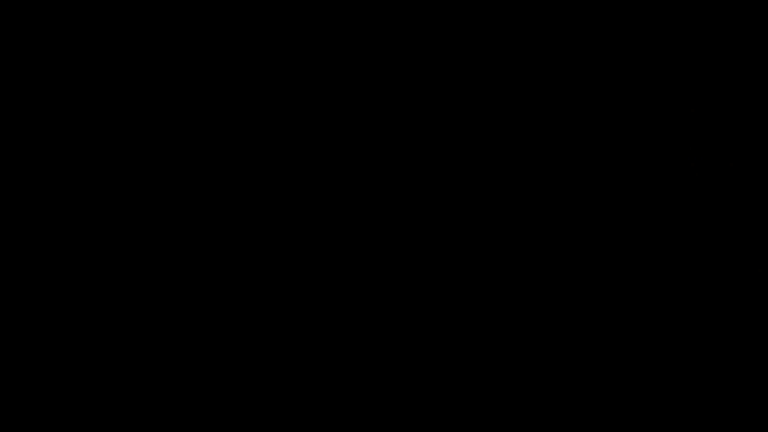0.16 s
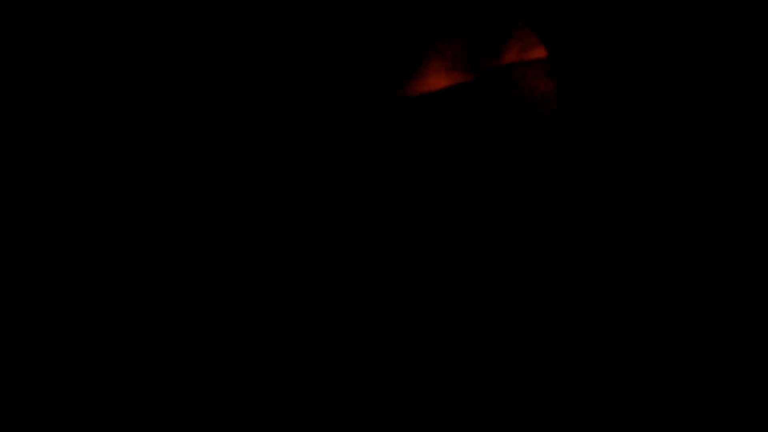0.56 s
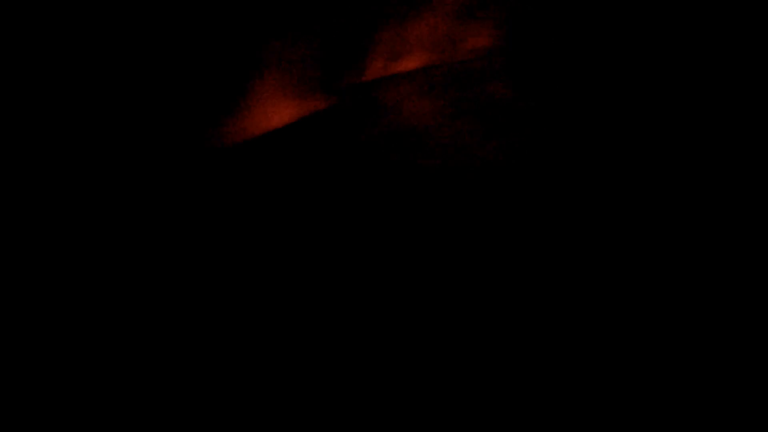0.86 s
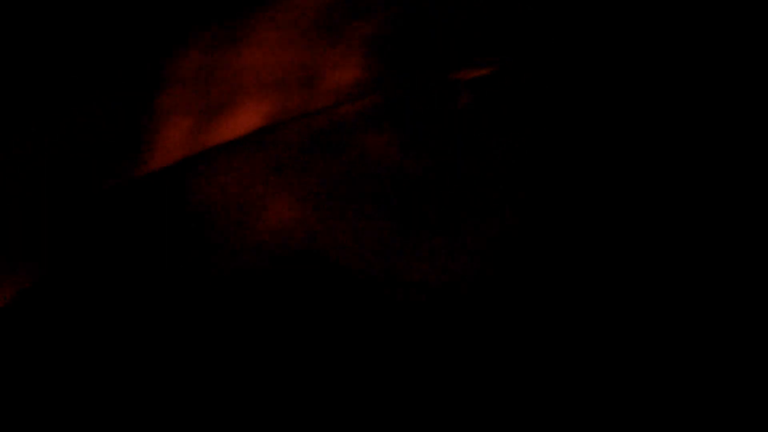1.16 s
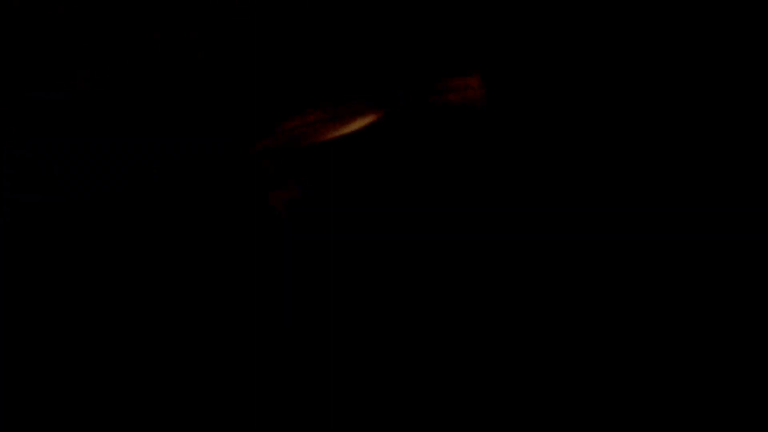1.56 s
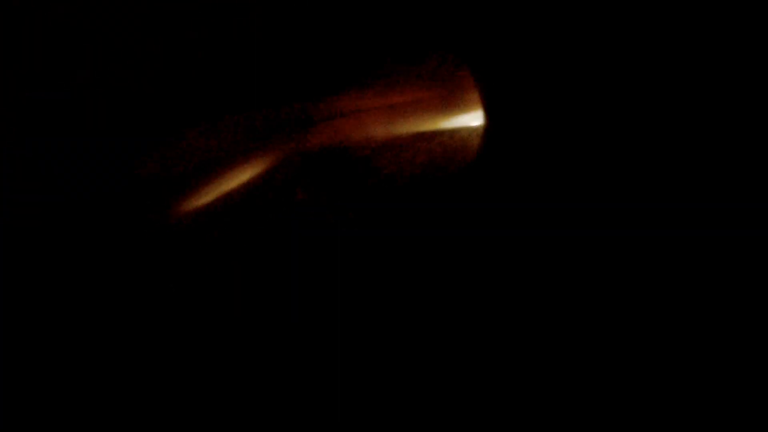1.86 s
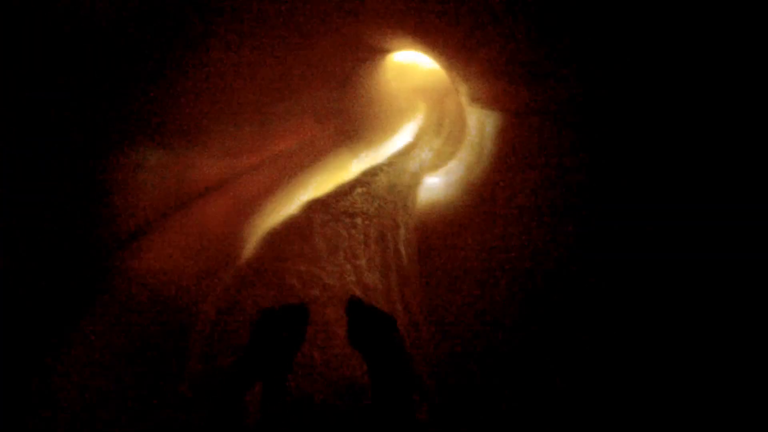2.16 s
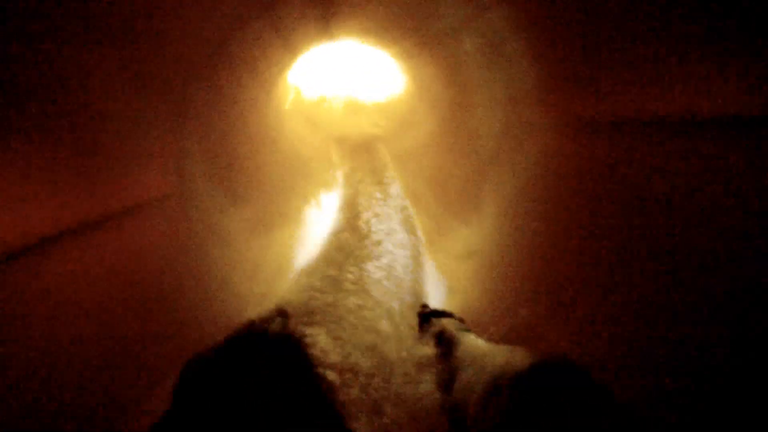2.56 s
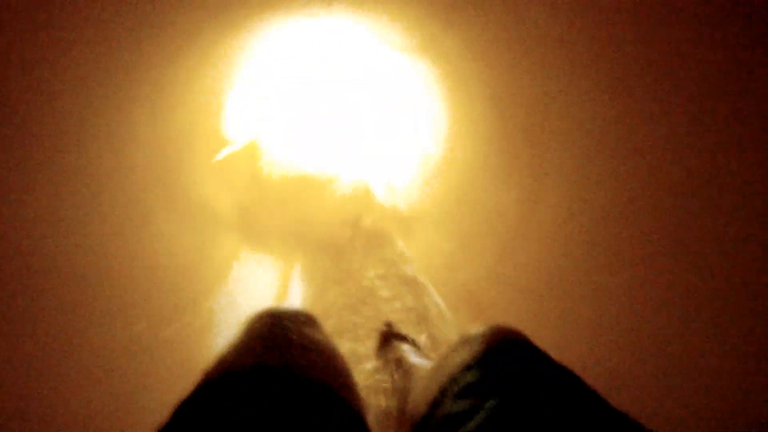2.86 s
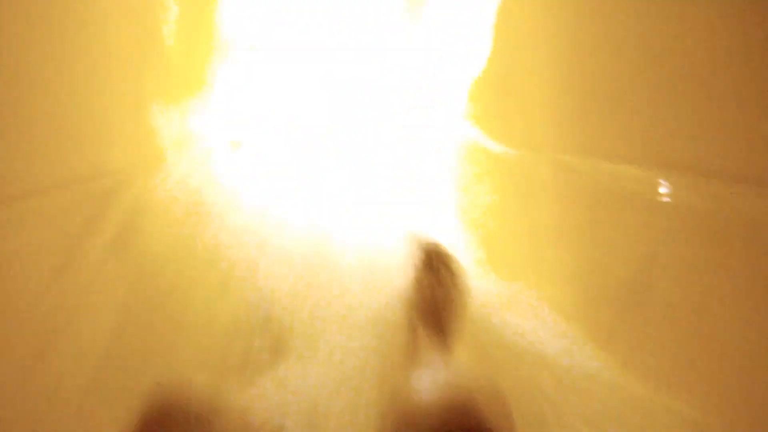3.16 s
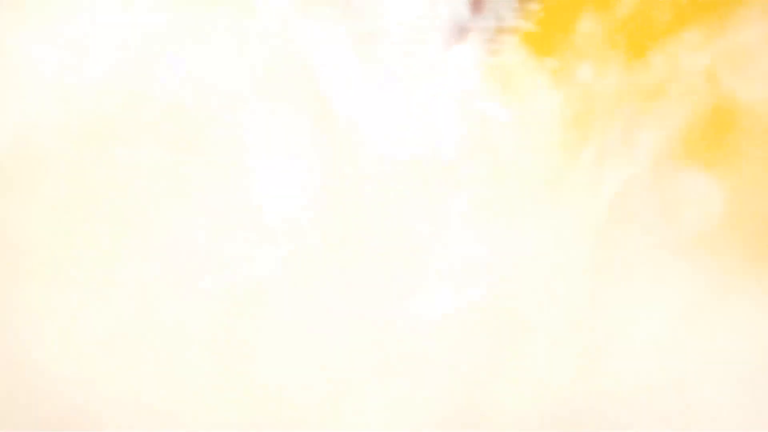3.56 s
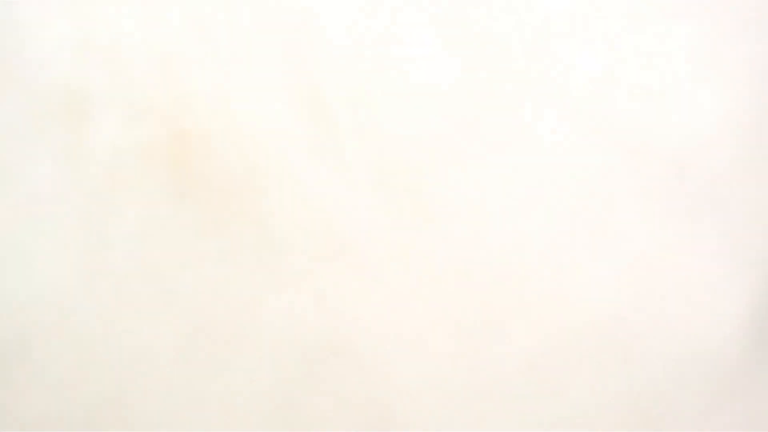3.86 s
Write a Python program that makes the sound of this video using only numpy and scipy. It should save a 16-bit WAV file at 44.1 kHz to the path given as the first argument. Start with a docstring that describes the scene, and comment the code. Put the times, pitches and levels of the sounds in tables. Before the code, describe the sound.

Water spray hisses on a cased microphone in an enclosed slide, then a loud splash into the pool

```python
"""Spray hisses on a sealed case around a microphone as a rider slides down an enclosed water tube.
The hiss is puffed noise through the case's resonances, struck once by a jet that rings the walls.
In the exit pool foam noise washes over the wet case in bursts, with ringing slaps and gurgling bubbles.
Behind lie the roar and rumble of the tube, as coloured noise. Dips near 6 and 12 kHz thin the treble
and the microphone input clips."""
import sys
import numpy as np
from scipy import signal
from scipy.io import wavfile
from scipy.ndimage import uniform_filter1d

SR = 44100
rng = np.random.default_rng(int(sys.argv[2]) if len(sys.argv) > 2 else 0)


def store_wav(level_fs):
    """Save 16-bit WAV to argv[1]."""
    pcm = np.round(np.clip(np.atleast_2d(level_fs), -1, 1) * 32767)
    wavfile.write(sys.argv[1], SR, pcm.T.astype(np.int16))


N = 176400
T = np.arange(N) / SR


def gain_of(db):
    """Amplitude ratio of a level in dB."""
    return 10 ** (np.asarray(db) / 20)


def evened(x):
    """Scale to unit RMS."""
    return x / np.sqrt(np.mean(x ** 2) + 1e-20)


def curve(rows, axis):
    """Gain over time from one dB column, near silent (-99 dB) outside the table."""
    rows = np.array(rows)
    return gain_of(np.interp(T, rows[:, 0], rows[:, axis], left=-99, right=-99))


def colour(x, points):
    """Minimum-phase filter of unit energy with the given spectrum, 18 dB/octave steeper outside it."""
    f_hz, level_db = np.transpose(points)
    grid_hz = np.abs(np.fft.fftfreq(8192, 1 / SR)) + 1  # +1 avoids log(0)
    outside = np.maximum(np.maximum(f_hz[0] / grid_hz, grid_hz / f_hz[-1]), 1)
    grid_db = np.interp(np.log(grid_hz), np.log(f_hz), level_db) - 18 * np.log2(outside)
    log_gain = np.log(gain_of(np.maximum(grid_db, -90)))
    min_phase = np.exp(np.conj(signal.hilbert(log_gain)))
    taps = np.fft.ifft(min_phase).real[:4096]
    return signal.oaconvolve(x, taps / np.linalg.norm(taps))[:len(x)]


def resonate(x, hz, width_hz):
    """One-pole resonance of gain 1: shift to 0 Hz, smooth, shift back."""
    turn = np.exp(2j * np.pi * hz * np.arange(len(x)) / SR)
    r = np.exp(-np.pi * width_hz / SR)
    return 2 * (turn * signal.lfilter([1 - r], [1, -r], x / turn)).real


def resonances(noise, modes):
    """Sum of double resonances, each at its own level."""
    return sum(gain_of(db) * evened(resonate(resonate(noise, hz, width_hz), hz, width_hz))
               for hz, width_hz, db in modes)


def fizz(per_s, spread_db, length_s, share):
    """Noise whose power is part steady, part decaying puffs of uneven size where drops land."""
    when, size = rng.random(N), rng.exponential(1, N)
    hits = gain_of(spread_db * np.minimum(size, 4)) * np.clip(per_s - when * SR, 0, 1)
    puffs = signal.lfilter([1], [1, -np.exp(-1 / (length_s * SR))], hits)
    power = 1 - share + share * evened(puffs) ** 2
    return evened(np.sqrt(power) * rng.standard_normal(N))


SWELL_RMS_DB, PATCH_RMS_DB = 0.35, 0.97


def patchy(x):
    """Gain drifting randomly over time and frequency, plus a swell shared by all frequencies."""
    z = signal.stft(x, nperseg=512, noverlap=384)[2]
    patches = uniform_filter1d(rng.standard_normal(z.shape), 8, axis=0)
    patches = uniform_filter1d(patches, 20, axis=1)
    swell = uniform_filter1d(uniform_filter1d(rng.standard_normal(z.shape[1]), 14), 14)
    z = z * gain_of(PATCH_RMS_DB * evened(patches) + SWELL_RMS_DB * evened(swell))
    return evened(signal.istft(z, nperseg=512, noverlap=384)[1][:N])


# Spray hiss in the tube: t/s, level/dB
HISS_LEVEL = [(0, -31), (.95, -30), (1.2, -31.5), (1.3, -31), (1.55, -29), (1.8, -31), (1.88, -28.5),
              (2.08, -30.5), (2.11, -25.5), (2.4, -28), (2.47, -29), (2.53, -27), (2.65, -28),
              (3.05, -28.5), (3.15, -30), (3.31, -25), (3.33, -20), (3.39, -23), (3.52, -20), (3.551, -26)]
# Closed case in air, spectrum: f/Hz, density/(dB per Hz)
CASE_DRY = [(710, -40), (1200, -14.5), (1320, -19), (1440, -8.5), (1750, -17.5), (2010, -1), (2240, 0),
            (2390, -3), (2630, -11.5), (2990, -14.5), (3260, -13), (4400, -22.5), (5340, -20), (6010, -29),
            (6620, -22), (7610, -26.5), (9430, -19.5), (10400, -22), (11900, -46), (13600, -25.5),
            (14200, -19), (15100, -21.5), (15600, -54)]
# Along the tube: t/s, roar level/dB, rumble level/dB, hiss brightness above 3 kHz/dB
TUBE = [(0, -46.5, -47.5, -1.5), (1.0, -45.5, -47, 0.3), (2.0, -45.5, -48.5, 0.6), (2.3, -41.5, -43.5, -1),
        (2.9, -42, -46, 2.5), (3.18, -42.5, -43, 2), (3.33, -35, -42.5, 1), (3.5, -32, -34, 1),
        (3.551, -30, -29, 5.5)]
DROPS_PER_S, DROP_SPREAD_DB, DROP_S, DROP_SHARE = 750, -2.5, 0.0021, 0.2


def spray_hiss():
    """Drops on the case as puffed noise, filtered by the dry case; brightness follows the tube."""
    hiss = patchy(colour(fizz(DROPS_PER_S, DROP_SPREAD_DB, DROP_S, DROP_SHARE), CASE_DRY))
    treble = signal.oaconvolve(hiss, signal.firwin(255, 3000, pass_zero=False, fs=SR), "same")
    return curve(HISS_LEVEL, axis=1) * (hiss + (curve(TUBE, axis=3) - 1) * treble)


# Case wall modes: f/Hz, width/Hz, level/dB
WALLS = [(1977, 43, -1), (2080, 89, -1.5), (2380, 130, -3.5), (2740, 200, -13.5), (3970, 380, -16),
         (7950, 520, -21), (9730, 420, -10.5), (14200, 500, -13)]
JET_S, JET_RISE_S, JET_HOLD_S, JET_FALL_S = 1.214, 0.026, 0.025, 0.015
JET_DB, JET_SPRAY_DB = -20.5, -14  # spray relative to the walls
JET_TAIL_DB, JET_TAIL_S = -11, 0.08


def jet():
    """A spray jet rakes the case once: noise excites the wall modes, then trails off."""
    t = T - JET_S
    after = np.maximum(t - JET_RISE_S - JET_HOLD_S, 0)
    fall = np.exp(-after / JET_FALL_S) + gain_of(JET_TAIL_DB) * np.exp(-after / JET_TAIL_S)
    shape = np.clip(t / JET_RISE_S, 0, 1) ** 2 * fall
    noise = rng.standard_normal(N)
    walls = evened(resonances(noise, WALLS))
    spray = gain_of(JET_SPRAY_DB) * evened(colour(noise, CASE_DRY))
    return gain_of(JET_DB) * (walls + spray) * shape


FROTH_PER_S, FROTH_LOW_HZ, FROTH_HIGH_HZ, FROTH_CYCLES = 400, 390, 3500, 4.5


def froth():
    """Small bubbles at random times: short blips of random pitch and size, rising slightly."""
    out = np.zeros(N)
    when, pitch, size = rng.random((3, N))
    hits = gain_of(12 * size) * np.clip(FROTH_PER_S - when * SR, 0, 1)
    pitch_class = (pitch * 24).astype(int)
    for k, hz in enumerate(np.geomspace(FROTH_LOW_HZ, FROTH_HIGH_HZ, 24)):
        cycles = np.arange(1500) / SR * hz
        envelope = cycles * np.exp(-3 * cycles / FROTH_CYCLES)
        blip = np.sin(2 * np.pi * cycles * (1 + 0.012 * cycles)) * envelope
        out += signal.oaconvolve(hits * (pitch_class == k), blip)[:N]
    return evened(out)


# Water over the case: t/s, level/dB, rumble level/dB, fullness below 1300 Hz/dB, brightness above 4 kHz/dB
PLUNGE = [(3.551, -7, -27, 6.5, -2.5), (3.565, -35.5, -27.5, -16, 10), (3.586, -36, -59, 1, 11),
          (3.61, -27, -37, -4, 2), (3.625, -37, -41, -10, 2), (3.652, -36, -50, -6, 4),
          (3.663, -33, -42, -8, -4), (3.67, -14.5, -28.5, -18, 4), (3.71, -16.5, -36, -9, -1),
          (3.74, -28, -43, 3, -4.5), (3.755, -16.5, -35, -0.5, -1), (3.79, -16.5, -29.5, 0.5, -2),
          (3.835, -16, -31, -2.5, 0), (3.85, -23, -47, -5, -1), (3.885, -18, -36, 3.5, -2),
          (3.91, -21, -32, 0.5, 2), (3.94, -13.5, -26, 1.5, -4), (3.982, -24, -36, -4, -1),
          (4.0, -12.5, -42, 4, -0.5)]
# Case with water on it, spectrum: f/Hz, density/(dB per Hz)
CASE_WET = [(150, -17), (333, -8.5), (608, -10), (846, -1.5), (1500, -3), (2110, 6), (2700, -2.5),
            (3640, -7), (4960, -15), (6030, -18.5), (9610, -9), (11700, -21), (14200, -11.5),
            (15600, -17.5)]
FOAM_PER_S, FOAM_SPREAD_DB, FOAM_S, FOAM_SHARE = 250, 2.5, 0.003, 0.58
FROTH_DB = -10.5  # relative to the foam


def plunge():
    """Foam noise and froth on the wet case; level, fullness and brightness vary by burst."""
    foam = patchy(colour(fizz(FOAM_PER_S, FOAM_SPREAD_DB, FOAM_S, FOAM_SHARE), CASE_WET))
    foam = evened(foam + gain_of(FROTH_DB) * froth())
    low = signal.oaconvolve(foam, signal.firwin(255, 1300, fs=SR), "same")
    high = foam - signal.oaconvolve(foam, signal.firwin(255, 4000, fs=SR), "same")
    shaped = foam + (curve(PLUNGE, axis=3) - 1) * low + (curve(PLUNGE, axis=4) - 1) * high
    return curve(PLUNGE, axis=1) * shaped


# Water slaps: t/s, ring level/dB, spray level/dB, thud level/dB, ring f/Hz, length/s
SLAPS = [(3.436, -9.5, -19, -35, 1480, 0.00098), (3.4965, -10, -20, -30, 1790, 0.0015),
         (3.5493, 0, -9, -5.5, 1940, 0.0025), (3.5589, -3.5, -2, -9, 2360, 0.0035),
         (3.581, 3.5, -9.5, -42, 2040, 0.0032), (3.602, -18, -20, -32, 2230, 0.0086),
         (3.631, -8.5, -18, -24, 2080, 0.0027), (3.637, -28, -13, -25.5, 1720, 0.0057),
         (3.6647, -0.5, -7.5, -24, 2220, 0.0013), (3.6755, -6, -14, -21, 2320, 0.0027),
         (3.683, -12, -22, -29, 2070, 0.0081), (3.6937, -1.5, -21, -35, 2130, 0.0025),
         (3.7032, -0.5, -14, -28, 2170, 0.0016), (3.7497, -6, -13, -20, 1710, 0.003),
         (3.8332, -3, -7.5, -27, 2497, 0.0042), (3.884, -9, -13.5, -26, 1500, 0.0045),
         (3.932, -10, -13, -30, 1970, 0.0031), (3.9398, -2.5, -11.5, -17, 1740, 0.004)]
SLAP_RISE_SHARE, SLAP_RING_WIDTH_HZ, SLAP_ROUGH, THUD_HZ = 0.44, 400, 0.32, 450  # rise / length
SLAP_TAIL_DB, SLAP_TAIL_S = -21, 0.0051


def slaps():
    """Water hits the case: spray puff, short roughened ring and low thud, with a soft tail."""
    out, t = np.zeros(N + 2000), np.arange(2000) / SR
    tail = gain_of(SLAP_TAIL_DB) * np.exp(-t / SLAP_TAIL_S)
    for s, ring_db, spray_db, thud_db, hz, length_s in SLAPS:
        noise = rng.standard_normal(2000)
        rise = np.sin(np.pi / 2 * np.minimum(t / (SLAP_RISE_SHARE * length_s), 1)) ** 2
        shape = rise * (np.exp(-(t / length_s) ** 3) + tail)
        ring = np.sin(2 * np.pi * hz * t) + SLAP_ROUGH * evened(resonate(noise, hz, SLAP_RING_WIDTH_HZ))
        spray = evened(colour(noise, CASE_WET))
        thud = evened(signal.lfilter(*signal.butter(2, THUD_HZ, fs=SR), noise))
        slap = gain_of(ring_db) * ring + gain_of(spray_db) * spray + gain_of(thud_db) * thud
        out[round(s * SR):][:2000] += shape * slap
    return out[:N]


# Trapped bubbles: t/s, level before envelope/dB, starting f/Hz, length/s
BUBBLES = [(2.952, -25.5, 950, 0.005), (3.692, -7, 1150, 0.0034), (3.771, -7, 990, 0.0034),
           (3.867, -13, 845, 0.0063), (3.884, -5.5, 800, .004), (3.933, -5.5, 830, 0.004),
           (3.992, -8.5, 820, 0.0043)]
BUBBLE_RISE_S, BUBBLE_GLIDE = 0.0016, 0.047


def bubbles():
    """Trapped bubbles gurgle against the case: short dying tones that rise slightly."""
    out, t = np.zeros(N + 2000), np.arange(2000) / SR
    for s, level_db, hz, length_s in BUBBLES:
        tone = np.sin(2 * np.pi * hz * t * (1 + BUBBLE_GLIDE * t / length_s))
        envelope = np.minimum(t / BUBBLE_RISE_S, 1) * np.exp(-(t / length_s) ** 2)
        out[round(s * SR):][:2000] += gain_of(level_db) * tone * envelope
    return out[:N]


# Roar spectrum: f/Hz, density/(dB per Hz)
ROAR = [(88, -30.5), (150, -7), (338, -10), (535, -10.5), (845, -8), (928, -6.5), (1400, -2.5), (1820, -28)]
# Air resonances in the roar: f/Hz, width/Hz, level/dB
HUM = [(493, 26, -13), (826, 48, -33.5)]
SPATTER_DB = -7  # relative to roar with hum


def tube_roar():
    """Coloured noise with air resonances and a spatter of bubbles and knocks of water."""
    roar = patchy(colour(rng.standard_normal(N), ROAR))
    roar = evened(roar + resonances(rng.standard_normal(N), HUM))
    roar = evened(roar + gain_of(SPATTER_DB) * evened(colour(froth(), ROAR)))
    return curve(TUBE, axis=1) * roar


# Rumble spectrum: f/Hz, density/(dB per Hz)
RUMBLE = [(30, 0.5), (43, 0), (200, -12)]


def rumble():
    """Low coloured noise, levelled along the tube and on through the plunge."""
    level = curve(TUBE, axis=2) + curve(PLUNGE, axis=2)
    return level * evened(colour(rng.standard_normal(N), RUMBLE))


def scene():
    """One microphone feeds both channels."""
    mono = spray_hiss() + jet() + plunge() + slaps() + bubbles() + tube_roar() + rumble()
    return np.tile(mono, (2, 1))


# Treble notches: f/Hz, width/Hz, depth/(0-1)
TREBLE_NOTCHES = [(6000, 830, 0.78), (12070, 2270, 0.7)]
EDGE_HZ = 15820


def record(dry):
    """Dips near 6 and 12 kHz thin the treble, the input clips at 0.95, a steep low-pass limits the band."""
    for hz, width_hz, depth in TREBLE_NOTCHES:
        notched = signal.lfilter(*signal.iirnotch(hz, hz / width_hz, fs=SR), dry)
        dry = dry + depth * (notched - dry)
    clipped = np.clip(dry, -.95, .95)
    taps = signal.firwin(2047, EDGE_HZ, window=("kaiser", 9), fs=SR)
    return np.clip(signal.oaconvolve(clipped, taps[None], "same"), -1, 1)


dry = scene()
out = record(dry)
store_wav(out)
```